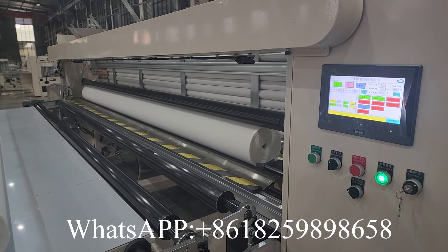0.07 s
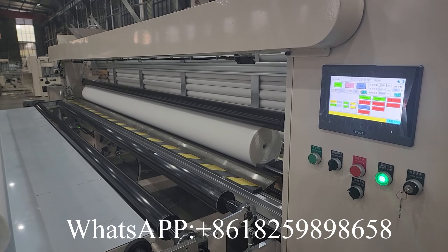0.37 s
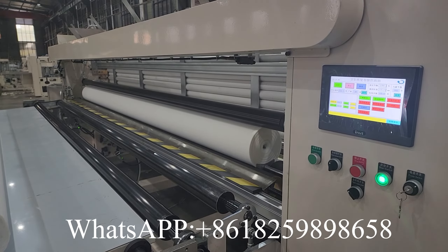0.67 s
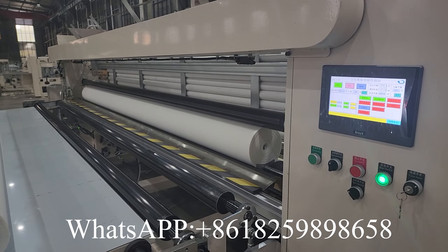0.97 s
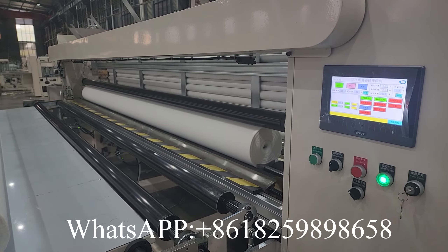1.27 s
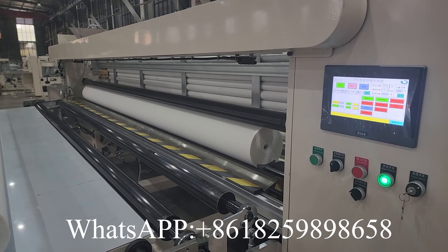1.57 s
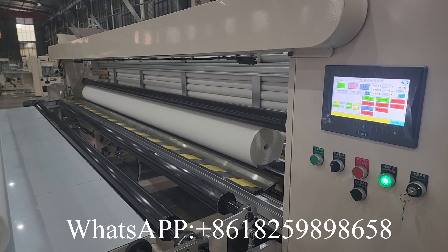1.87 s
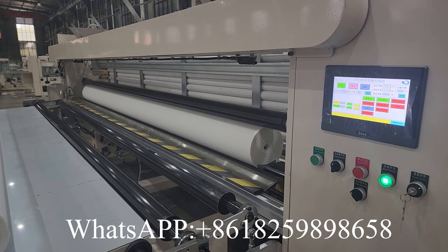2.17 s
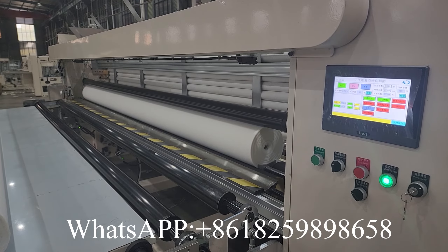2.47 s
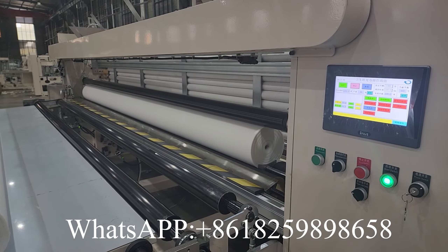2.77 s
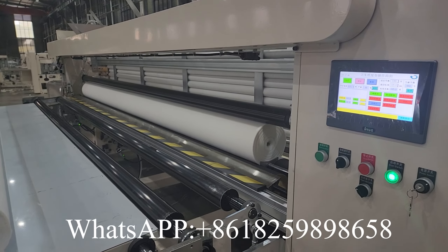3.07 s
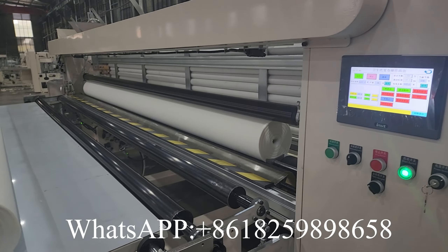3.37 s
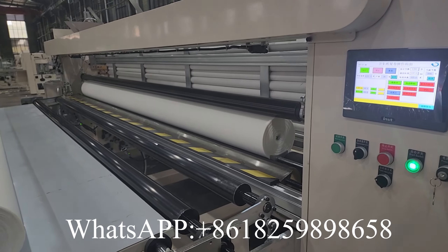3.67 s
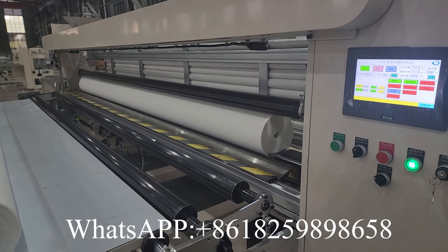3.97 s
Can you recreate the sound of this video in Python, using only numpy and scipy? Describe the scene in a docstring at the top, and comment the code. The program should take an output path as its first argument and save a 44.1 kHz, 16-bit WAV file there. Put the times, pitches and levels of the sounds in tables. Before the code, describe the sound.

A large factory machine's high whine and rumble hold steady, then wind down.

```python
"""A finely patterned steel roller whines in a paper rewinder that runs at full speed, then slows down. Its
teeth strike the nip, so the pitch is their passing frequency and falls with the speed. Paper friction rasps in
four surges a turn; the drive roars, rumbles and shakes the frame's resonances. Air puffs out in three soft
swishes, and as the speed falls, two short jets of air escape over the hall's hum."""
import sys
import numpy as np
from scipy import signal
from scipy.fft import rfft, irfft
from scipy.io import wavfile

SR = 44100
rng = np.random.default_rng(int(sys.argv[2]) if len(sys.argv) > 2 else 0)


def file_out(sig):
    """Save sig as 16-bit WAV at sys.argv[1]."""
    # one column per channel
    cols = np.atleast_2d(sig).T
    # limit, then scale
    lim = np.clip(cols, -1, 1)
    pcm = np.round(lim * 32767).astype(np.int16)
    wavfile.write(sys.argv[1], SR, pcm)


N = 176400
T = np.arange(N) / SR
HZ = np.fft.rfftfreq(N, 1 / SR)

# roller speed (time [s], tooth-passing frequency [Hz])
TOOTH_RATE = [(0, 9125), (.3, 9215), (.85, 9150), (1.3, 9215), (1.75, 9170), (2.13, 9220), (2.3, 8920),
              (2.45, 8270), (2.8, 6440), (3.15, 4720), (3.35, 3850), (3.55, 2850), (4, 800)]
TEETH, FULL_SPEED_HZ = 1717, TOOTH_RATE[0][1]


def roller_whine(turns):
    """Periodic impact: teeth strike the nip at their passing frequency; high spots make the tone pulse."""
    # fundamental (time [s], level [dB], left minus right [dB])
    fundamental = [(0, -19.6, 2.2), (2.33, -19.8, 1.5), (2.55, -21, 1), (2.64, -16.5, -5),
                   (2.77, -18.5, -11), (2.85, -22.5, -4), (2.98, -21.5, -9), (3.13, -29, 3), (3.2, -32, -6),
                   (3.26, -30.5, -6), (3.31, -39, -4), (3.355, -28, 1), (3.42, -40, -2), (3.51, -39, -2),
                   (3.8, -65, 0)]
    # high spots that press harder (position [turns], relative swell [dB])
    high_spots = [(.07, 6), (.138, 7.5), (.305, 6.5), (.355, 7), (.402, 7.5), (.462, 11.5), (.55, 6.5),
                  (.59, 5), (.64, 5), (.8, 4.5), (.888, 5.5)]
    spot_width_turns, room_gain = .016, amp(-7)
    teeth = tooth_phasor(turns)
    tone = unit((teeth * unevenness(turns)).real) * amp(curve(fundamental))
    tone = tone * pan(curve(fundamental, column=2)) + fringe(teeth) + overtones(teeth)
    swell_db = 0
    for place, db in high_spots:
        distance = (turns - place + .5) % 1 - .5
        swell_db += db * gaussian(distance, spot_width_turns)
    direct = tone * unit(amp(swell_db))
    return (direct + room_gain * reverb(direct)) / np.hypot(1, room_gain)


def tooth_phasor(turns):
    """Frequency modulation: the speed wavers four times a turn and jitters at random."""
    wobble_hz, crest_turns, jitter_hz = 49.3, .066, 36
    wobble = wobble_hz * curve(TOOTH_RATE) / FULL_SPEED_HZ * np.cos(2 * np.pi * 4 * (turns - crest_turns))
    jitter = jitter_hz * flutter(rate_hz=110)
    cycles = TEETH * turns + np.cumsum(wobble + jitter) / SR
    return np.exp(2j * np.pi * cycles)


def unevenness(turns, width_hz=66, skirt_hz=220, size=2048):
    """Periodic modulation: the roller's irregular pattern repeats every turn and adds sidebands."""
    offset_hz = np.fft.fftfreq(size, 1 / size) * FULL_SPEED_HZ / TEETH  # at full speed
    sidebands = gaussian(offset_hz, width_hz) + amp(-6.5) * gaussian(offset_hz, skirt_hz)
    patterns = unit(random_phases(sidebands))
    patterns /= np.hypot(abs(patterns), 1)  # softens the peaks
    return np.array([np.interp(turns, np.arange(size) / size, unit(p), period=1) for p in patterns])


def fringe(teeth, above_hz=520):
    """Frequency shifting: a band of hiss rides just above the whine."""
    # hiss (time [s], level [dB])
    level = [(2.1, -44), (2.45, -35), (2.8, -31), (3.1, -31.5), (3.45, -37.5), (3.85, -49)]
    shifted = teeth * np.exp(2j * np.pi * above_hz * T)
    return blur(shifted, width_hz=360) * amp(curve(level)) * pan(-5)[:, None]


def overtones(teeth):
    """Harmonic series: faint noisy bands follow whole multiples of the tooth-passing frequency."""
    # harmonics (multiple, base level [dB], half-width [Hz])
    harmonics = [(2, -37, 240), (3, -46, 320)]
    # swell and fade of both harmonics (time [s], gain [dB])
    fade = [(2.5, -4), (2.8, 4.5), (3.2, -1.5), (3.56, -2.5), (3.75, -17)]
    bands = 0
    for multiple, db, width_hz in harmonics:
        below_nyquist = multiple * curve(TOOTH_RATE) < SR / 2
        bands += blur(teeth ** multiple, width_hz) * below_nyquist * amp(db + curve(fade))
    return bands


def paper_rasp(turns):
    """Friction noise: paper rubs over the rollers, surging four times a turn and fluttering at random."""
    # surges within a turn (position [turns], relative strength)
    surges = [(.155, 0.82), (.408, 0.76), (.675, 0.16), (.915, 0.46)]
    # friction spectrum (frequency [Hz], relative level [dB])
    spectrum = [(500, -13), (1000, -3), (1700, -17), (2500, -13), (2900, -2.5), (3130, 0), (3400, 1.1),
                (3850, -2), (4650, 1), (5050, -2.5), (5500, 1.2), (6000, -2), (6600, 4.5), (6900, 1),
                (7400, 4), (7900, -4), (8350, -1), (8800, -8), (10700, -9.5), (11600, -4), (12600, -7.5),
                (14000, -35)]
    # stereo balance (frequency [Hz], left minus right [dB])
    balance = [(1300, 4), (2400, 0), (3200, -3.5), (4600, -1.5), (5500, -6), (6600, -6.5), (7400, -8.5),
               (7900, 1), (10000, 0), (11600, -4.5), (13500, -2)]
    # rasp before modulation (time [s], level [dB])
    level = [(0, -21), (2.3, -21), (2.7, -23.5), (3, -26.5), (3.25, -28), (3.55, -31.5), (3.85, -33.5),
             (4, -36)]
    rise_turns, fall_turns = .014, .078
    surge = 1
    for place, strength in surges:
        since = (turns - place) % 1
        surge += strength * (1 - np.exp(-since / rise_turns)) * gaussian(since, fall_turns)
    flicker_db = .7 * flutter(rate_hz=70)
    friction = noise(amp(over_frequency(spectrum)) * pan(over_frequency(balance)))
    return friction * unit(surge) * amp(curve(level) + flicker_db)


def drive():
    """Structure-borne noise: belts and gears roar through the frame, and the heavy rolls rumble."""
    # belts and gears, then rolls (frequency [Hz], relative level [dB])
    roar_spectrum = [(100, -18), (156, -2), (172, -12.5), (198, 4), (222, -10), (258, 4), (277, 4.5),
                     (288, -4), (308, 1.5), (342, -5.5), (358, -4.5), (385, -1.5), (425, -4), (445, -1),
                     (525, -7), (550, -5.5), (620, -11), (800, -12), (1150, -23), (1500, -18.5),
                     (3000, -22)]
    rumble_spectrum = [(15, -33), (30, -17), (42, -9), (58, -4.5), (88, 1), (115, -9.5), (145, -8),
                       (200, -1.5), (400, -21), (1000, -52)]
    # both fade as the machine slows (time [s], level [dB])
    roar_level = [(0, -21), (.4, -22), (2.25, -21.5), (2.6, -24.5), (2.95, -27), (3.3, -32.5), (3.7, -34),
                  (4, -39.5)]
    rumble_level = [(0, -26.5), (2.6, -26.5), (3.1, -29.5), (3.6, -32), (4, -39)]
    roar = coloured_noise(roar_spectrum) * amp(curve(roar_level))
    rumble = coloured_noise(rumble_spectrum) * amp(curve(rumble_level))
    return roar + rumble


def frame_resonances():
    """Forced vibration: parts shaken at random sound in narrow bands about their natural frequencies."""
    # envelope of each mode (time [s], level [dB])
    drone = [(2.15, -40), (2.38, -22), (2.7, -31.5), (2.9, -34.5), (3.3, -28), (3.8, -44.5)]  # a panel drones while the speed falls
    hum = [(0, -34), (.8, -32.5), (2, -30), (2.4, -46), (4, -51)]  # the drive hums at full speed
    guard = [(.1, -42), (.25, -27), (.5, -30.5), (.65, -30), (2.05, -36), (2.25, -30), (2.8, -47)]  # a guard rattles up now and then
    ring = [(1.4, -39.5), (2.3, -36.5), (2.7, -45), (4, -57)]  # the drive rings thinly, most as the slowing begins
    panel = [(3.44, -57), (3.51, -32), (3.57, -31.5), (3.63, -47), (3.8, -58)]  # a panel sings, timed to the whine crossing its pitch
    shudder = [(2.0, -53), (2.6, -27.5), (3.3, -43.5), (4, -45)]  # the frame shudders as the rolls lose speed
    # modes (natural frequency [Hz], half-width [Hz], envelope)
    modes = [(302.6, 12.4, drone), (402.7, 8.4, hum), (362.7, 7.2, guard),
             (1335, 72, ring), (3220, 69, panel), (132, 33, shudder)]
    return sum(noise(lorentzian(HZ - hz, width)) * amp(curve(level)) for hz, width, level in modes)


def air_jets():
    """Turbulent noise: two short jets of escaping air hiss and die away."""
    # jets (time [s], level [dB], decay [dB/s])
    events = [(3.44, -26.5, 46), (3.945, -27.5, 66)]
    # hiss (frequency [Hz], relative level [dB])
    spectrum = [(600, -14), (1300, -4.5), (1880, 0.5), (2700, 2.5), (3600, -10), (4290, 4.5), (4750, -14),
                (5190, 3), (6600, -4.5), (16000, -24)]
    return coloured_noise(spectrum) * burst_envelope(events)


def swishes():
    """Amplitude modulation: a band of noise opens and fades in three soft swishes."""
    # swishes (time [s], level [dB], decay [dB/s])
    events = [(.46, -27.5, 56), (1.0, -29, 50), (1.69, -29, 21)]
    # noise band (frequency [Hz], relative level [dB])
    spectrum = [(500, -44), (1000, -6.5), (1900, 11.5), (2700, 12.5), (3500, 11.5), (6000, -12),
                (16000, -32)]
    return coloured_noise(spectrum) * burst_envelope(events)


def hall_hum():
    """Stationary noise: the steady background of the hall, strongest in the bass."""
    # background (frequency [Hz], relative level [dB])
    spectrum = [(20, -21), (38, -10), (60, -5.5), (161, -5), (250, -11.5), (500, -17.5), (680, -18),
                (1190, -26.5), (2000, -23.5), (3160, -21.5), (3820, -23.5), (7110, -28.5), (8590, -37),
                (16000, -48)]
    return amp(-28.5) * coloured_noise(spectrum)


def reverb(x, t60_s=.64):
    """Reverberation: the hall's diffuse echoes decay exponentially."""
    tail = rng.standard_normal((2, SR)) * amp(-60 * T[:SR] / t60_s)
    return signal.fftconvolve(x, tail / np.linalg.norm(tail[0]), axes=1)[:, :N]


def burst_envelope(events, rise_s=.0083):
    """Exponential decay: each burst opens quickly, then loses level at a constant rate."""
    envelope = 0
    for start, db, decay in events:
        age = np.maximum(T - start, 0)
        envelope += np.minimum(age / rise_s, 1) * amp(db - decay * age)
    return envelope


def noise(gain):
    """Partial coherence: spectrally shaped stereo noise, alike on both sides in the bass."""
    # likeness of left and right (frequency [Hz], correlation [0-1])
    likeness = [(25, .96), (60, 1), (170, 0.95), (350, 0.91), (700, 0.42), (1400, 0.07), (6000, 0.03)]
    correlation = over_frequency(likeness)
    left, independent = rfft(rng.standard_normal((2, N)))
    right = correlation * left + np.sqrt(1 - correlation ** 2) * independent
    return unit(irfft(np.array([left, right]) * gain, N))


def coloured_noise(spectrum):
    """Spectral shaping: stereo noise follows a table of levels over frequency."""
    return noise(amp(over_frequency(spectrum)))


def flutter(rate_hz):
    """Low-pass noise: a random fluctuation of rms near 1."""
    return noise(np.exp(-(HZ / rate_hz) ** 2))[0]


def blur(tone, width_hz):
    """Line broadening: random modulation smears a gliding tone into a band of hiss."""
    spread = lorentzian(np.fft.fftfreq(N, 1 / SR), width_hz)
    return unit((tone * random_phases(spread)).real)


def random_phases(magnitudes):
    """Fourier synthesis: two complex signals with one magnitude spectrum and independent phases."""
    return np.fft.ifft(magnitudes * np.exp(2j * np.pi * rng.random((2, len(magnitudes)))))


def lorentzian(offset, width):
    """Resonance curve that falls to one half at an offset of one width."""
    return 1 / (1 + (offset / width) ** 2)


def gaussian(offset, width):
    """Bell curve whose width is its standard deviation."""
    return np.exp(-.5 * (offset / width) ** 2)


def curve(rows, column=1):
    """Linear interpolation of a table column over time."""
    rows = np.array(rows)
    return np.interp(T, rows[:, 0], rows[:, column])


def over_frequency(rows):
    """Linear interpolation of a table over log frequency."""
    hz, value = np.transpose(rows)
    return np.interp(np.log(HZ + 1), np.log(hz), value)


def pan(db):
    """Constant-power panning: two gains from a left-minus-right level."""
    gains = amp(np.array([db, -db]) / 2)
    return gains / np.sqrt(np.mean(gains ** 2, 0))


def amp(db):
    """Decibels to amplitude ratio."""
    return 10 ** (np.asarray(db) / 20)


def unit(x):
    """Normalisation to rms 1."""
    return x / np.sqrt(np.mean(abs(x) ** 2) + 1e-20)


def scene():
    """Superposition: the machine's sources add to the steady noise of the hall."""
    turns = np.cumsum(curve(TOOTH_RATE)) / SR / TEETH
    machine = roller_whine(turns) + paper_rasp(turns) + drive() + frame_resonances()
    return machine + air_jets() + swishes() + hall_hum()


def record(dry, cutoff_hz=15900):
    """Band limiting: a steep low-pass filter removes the highest treble."""
    low_pass = signal.firwin(511, cutoff_hz, window=("kaiser", 9), fs=SR)
    return signal.oaconvolve(dry, low_pass[None], "same")


dry = scene()
out = record(dry)
file_out(out)
```